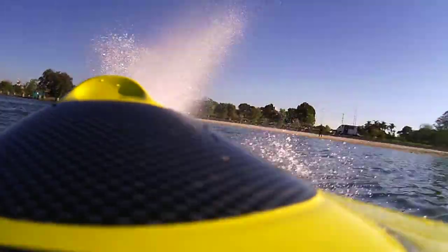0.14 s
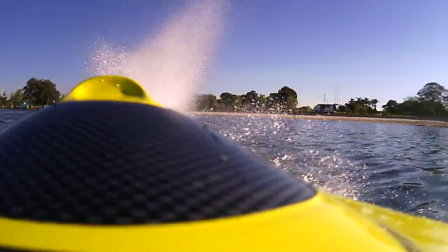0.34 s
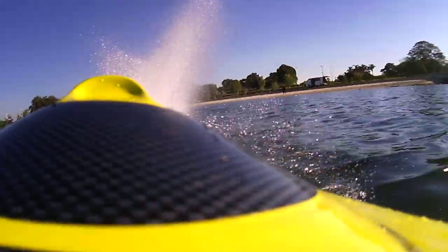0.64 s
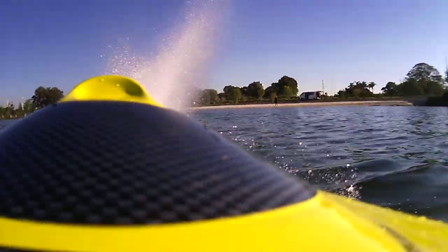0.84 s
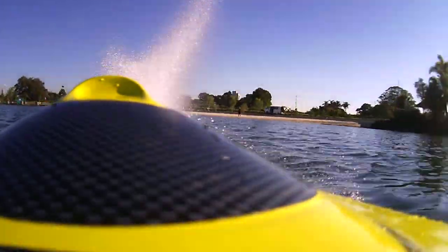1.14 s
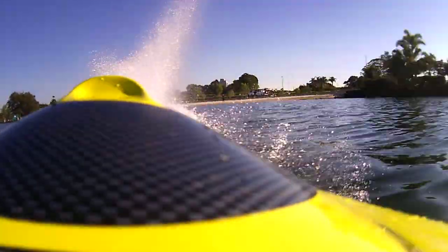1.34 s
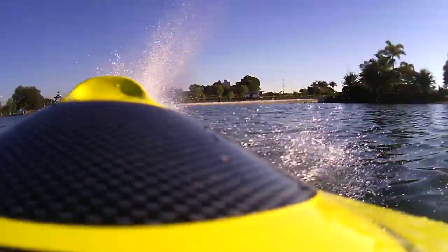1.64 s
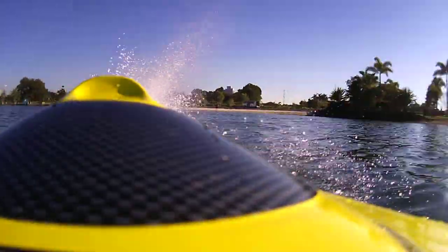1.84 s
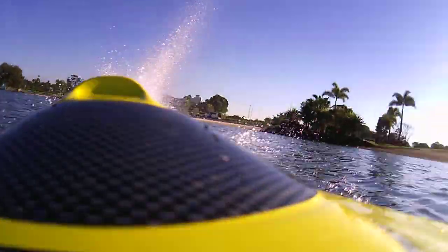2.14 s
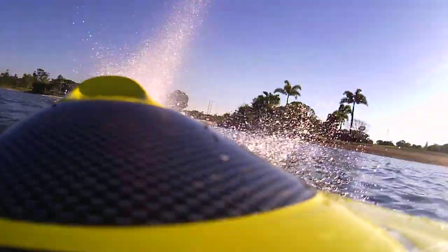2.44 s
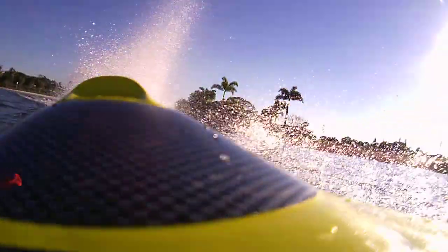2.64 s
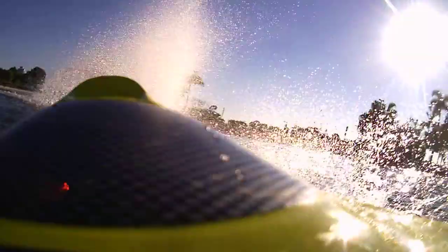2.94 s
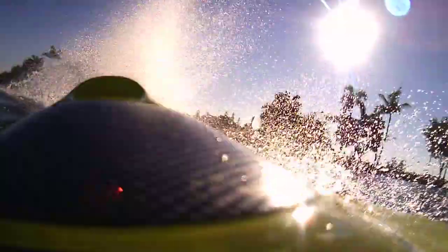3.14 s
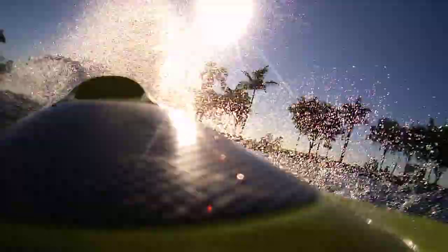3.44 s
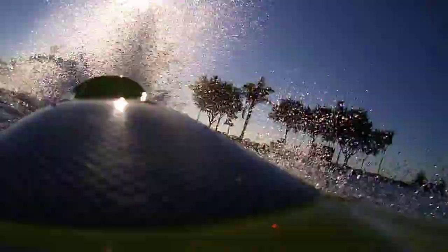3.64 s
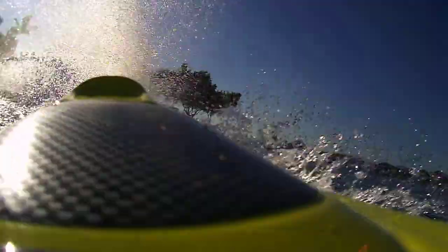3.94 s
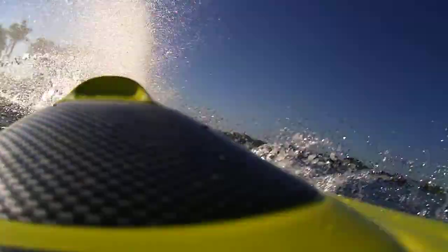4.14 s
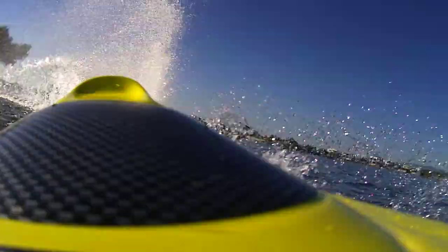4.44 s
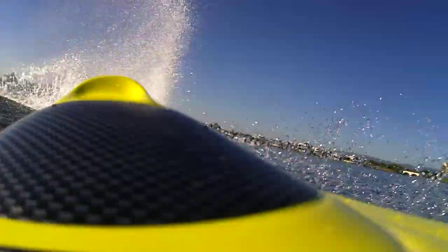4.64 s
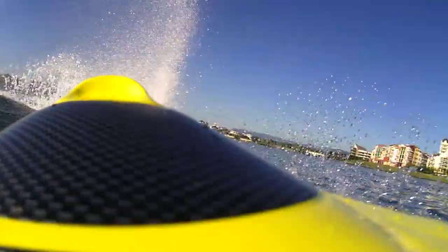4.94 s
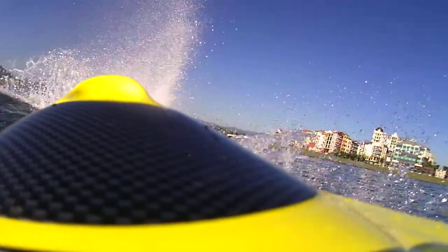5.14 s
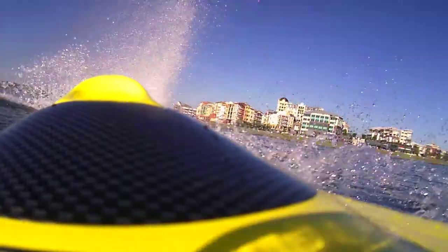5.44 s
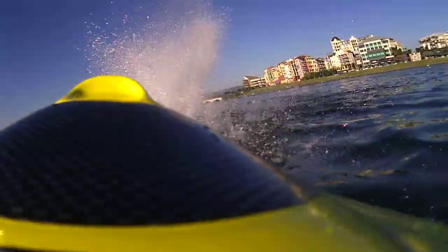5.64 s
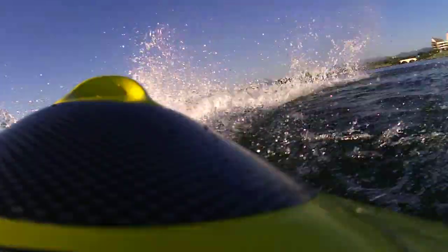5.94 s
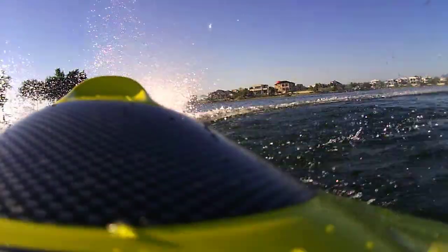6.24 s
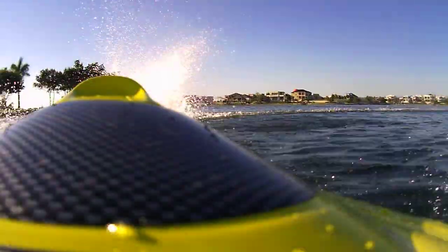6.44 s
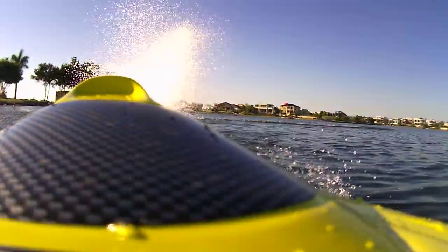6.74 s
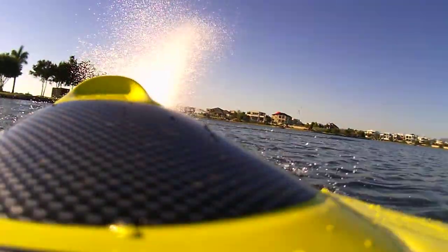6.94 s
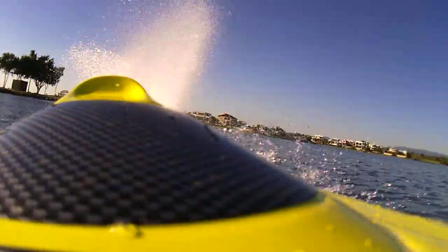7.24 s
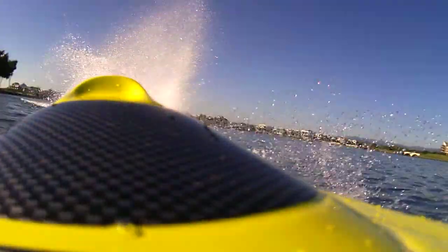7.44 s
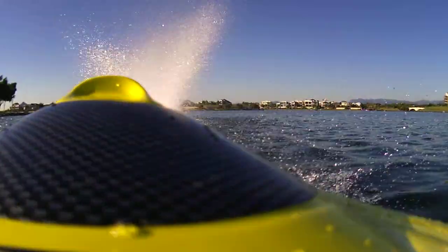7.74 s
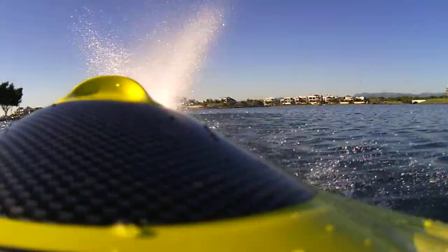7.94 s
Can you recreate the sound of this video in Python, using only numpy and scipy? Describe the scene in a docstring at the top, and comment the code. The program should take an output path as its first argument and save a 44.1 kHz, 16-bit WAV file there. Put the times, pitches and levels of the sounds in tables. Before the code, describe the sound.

A model speedboat's electric motor whines high and loud at full throttle, slightly overloading a microphone on its hull. The pitch falls and holds lower, throbbing as the boat bounces through a turn. After a quick blip it sinks almost to idle, then climbs again with a faint rough rattle. Lake water rushes underneath throughout, with a few soft slaps, while spray hisses and ticks on the deck.

```python
"""A model boat's brushless motor whines across a lake, a hand's reach from a camera's microphone on the hull.
Harmonics of the turning shaft glide through the hull's resonances as the motor runs at full throttle,
eases off, blips, almost idles and climbs again; the drive line rattles once every second turn.
Water rushes, drums and slaps under the hull, and spray hisses and ticks on the deck.
This close, the loudest stretches overload the camera."""
import sys
import numpy as np
from scipy.fft import rfft, irfft, next_fast_len
from scipy.io import wavfile
from scipy.ndimage import map_coordinates

SR = 44100
rng = np.random.default_rng(int(sys.argv[2]) if len(sys.argv) > 2 else 0)


def materialize(psi):
    """Save the field psi as 16-bit PCM at rate SR to the path in sys.argv[1].

    A 1-D psi becomes a single channel; in a 2-D psi each row is a channel.
    """
    bounded = np.clip(np.atleast_2d(psi).T, -1, 1)
    quanta = np.round(bounded * 32767).astype(np.int16)
    wavfile.write(sys.argv[1], SR, quanta)


N = 357210
TIME = np.arange(N) / SR


def amp(db):
    """Decibels to gain."""
    return 10 ** (np.asarray(db) / 20)


def unit(x):
    """Scale to rms 1."""
    return x / np.sqrt(np.mean(x ** 2) + 1e-20)


def level_at(spectrum, hz):
    """A spectrum's level in dB, read on a log frequency axis."""
    freqs, levels = np.transpose(spectrum)
    return np.interp(np.log(hz + 1), np.log(freqs + 1), levels)


def curves(rows, at=TIME):
    """One curve for each column after the first, read at the given times or speeds."""
    axis, *columns = np.transpose(rows)
    return [np.interp(at, axis, column) for column in columns]


def filtered(x, response):
    """Apply a gain that depends on frequency."""
    size = next_fast_len(N + 8192)
    return irfft(rfft(x, size) * response(np.fft.rfftfreq(size, 1 / SR)), size)[:N]


def coloured(x, spectrum):
    """Shape x by a spectrum, at rms 1."""
    return unit(filtered(x, lambda hz: amp(level_at(spectrum, hz))))


def wobble(rate):
    """A smooth random curve, rate knots a second."""
    coarse = np.arange(0, N + 32, 32)
    knots = rng.standard_normal(8192)
    return np.interp(np.arange(N), coarse, map_coordinates(knots, [coarse * rate / SR], mode="wrap"))


def add(track, start_s, sound):
    """Mix a short sound into a track."""
    part = track[round(start_s * SR):][:len(sound)]
    part += sound[:len(part)]


# Throttle moves out on the lake: t/s, new shaft speed/Hz, ramp/s
THROTTLE_MOVES = [(0.121, 418.8, 0.16), (0.728, 424.1, 0.273), (1.138, 417.8, 0.147), (1.315, 369.5, 0.101),
                  (1.409, 321.4, 0.204), (1.591, 266.0, 0.152), (1.813, 280.3, 0.178),
                  (3.176, 291.0, 0.701), (4.321, 298.8, 0.217), (4.689, 297.2, 0.155),
                  (4.907, 298.3, 0.157), (5.427, 335.1, 0.018), (5.444, 375.7, 0.068),
                  (5.519, 328.7, 0.092), (5.649, 271.8, 0.029), (5.719, 206.6, 0.028), (5.753, 184.6, 0.05),
                  (5.866, 194.1, 0.114), (6.265, 229.8, 0.08), (6.346, 322.4, 0.091), (6.756, 339.4, 0.121),
                  (7.221, 335.1, 0.195), (7.864, 363.6, 0.202)]
def shaft(start_hz, jitter, jitter_rate):
    """Shaft speed and angle: it ramps with the throttle and trembles as the propeller bites unevenly."""
    speed, last_hz = np.full(N, start_hz), start_hz
    for start, hz, ramp_s in THROTTLE_MOVES:
        speed += (hz - last_hz) * np.clip((TIME - start) / ramp_s, 0, 1)
        last_hz = hz
    trembling = speed * (1 + jitter * wobble(jitter_rate))
    return speed, 2 * np.pi * np.cumsum(trembling) / SR


def partial(angle, flutter_db, smear_rad, drift_rad=0.57):
    """One tone of rms 1 whose strength and phase flutter as the hull skips over ripples."""
    strength = amp(flutter_db * unit(wobble(24) + 1.2 * wobble(70)))
    drift = drift_rad * wobble(2)  # each tone's phase wanders slowly at random
    return unit(strength * np.sin(angle + smear_rad * wobble(55) + drift + rng.uniform(0, 2 * np.pi)))


# Single orders swelling or fading at the microphone: start/s, end/s, shaft order, lift/dB
ORDER_SWELLS = [(0, .65, 3, 3.5), (0, 1.4, 4, 2), (1.467, 1.58, 1, 5.5), (1.65, 1.686, 4, 7),
                (1.677, 2.502, 6, -17), (1.84, 1.888, 12, 15), (2.1, 2.17, 3, 8), (2.348, 2.97, 1, -4.5),
                (2.38, 3.29, 4, 1.7), (3.55, 4.0, 5, 4), (3.64, 5.15, 3, -7), (5.22, 5.37, 2, -7.5),
                (5.788, 5.87, 4, 13.5), (5.95, 6.135, 6, 9), (5.95, 6.288, 4, -5), (6.308, 6.35, 5, 11),
                (6.31, 6.36, 14, 16), (6.504, 6.68, 1, -15), (6.75, 7.249, 1, -7), (6.95, 7.8, 3, 1.7),
                (7.33, 7.747, 4, 2.5), (6.85, 8.1, 5, 3)]
def swelling(order, edge_s=0.035):
    """Passing lift or dip of one shaft order, in dB."""
    return sum(db * np.clip(np.minimum(TIME - start, end - TIME) / edge_s + 0.5, 0, 1)
               for start, end, multiple, db in ORDER_SWELLS if round(multiple) == order)


# Load on the propeller, high at full throttle and in the hard turn: t/s, load/dB
PROPELLER_LOAD = [(0, 10), (.35, 10), (1.3, 6.5), (1.8, -8.5), (1.92, -2.5), (2.35, -3.5), (2.4, -0.5),
                  (3.27, 1), (3.31, -6.5), (3.9, -1.5), (4.7, -8), (5.4, -6.5), (5.52, 4.5), (5.7, -6),
                  (5.9, -7.5), (6, 3), (6.25, 2), (6.42, -11.5), (6.75, 0), (6.9, -0.5), (7.45, 2.5),
                  (7.95, 2.5), (8.05, 9.5)]
# The motor's whistle at full throttle: t/s, level/dB
WHISTLE_LEVEL = [(0, -32.5), (.3, -27.5), (1.33, -21), (1.45, -41), (1.6, -83.5)]
# Hull and camera housing, between motor and microphone: f/Hz, gain/dB
HULL_RESPONSE = [(190, -23.5), (275, -28.5), (295, -26), (350, -14), (420, -8.5), (560, -6), (700, -15.5),
                 (840, -4.5), (900, -8.5), (1000, 2), (1160, 4), (1300, -5.5), (1440, 1.5), (1550, -4),
                 (1700, -4), (2100, -11.5), (2400, -5), (3100, -19), (3370, -7), (3550, -15.5),
                 (4200, -17.5)]
# Body of the whine: shaft order, level before the hull/dB, dB per dB of load, share of the throb,
# flutter/dB, phase smear/rad
LOW_ORDERS = [(1, -3.5, -0.21, 0, 1.5, .05), (2, -13, 0.6, 0.12, 2.03, 0.063), (3, -22, 1, 0, 2.12, .05),
              (4, -21.5, 0.944, 0.87, 1.4, 0.06)]
# Top of the whine: shaft order, level before the hull/dB, dB per dB of load, level on the whistle/dB
UPPER_ORDERS = [(5, -24, 0.54, -17.5), (6, -25.5, 0.8, -7.5), (7, -26, 0.74, -15), (8, -26.5, 0.6, 2),
                (9, -34, 1.2, -3.5), (10, -29.5, 0.65, -11.5), (11, -27.5, 1.2, -27), (12, -30, 0.5, -30),
                (13, -31, -0.2, -23), (14, -36, -0.2, -25.5), (17, -41, -0.5, -29), (18, -36.5, 2, -29)]
def motor(speed, angle, spurt_db=2, spurt_rate=11):
    """Shaft orders follow the load and flare as they glide through the hull's resonances."""
    load_db, = curves(PROPELLER_LOAD)
    whistle_db, = curves(WHISTLE_LEVEL)
    throb_db = throbbing(width_s=0.017)

    def through_hull(order, db, per_load, throb_share):
        source_db = db + per_load * load_db + throb_share * throb_db + swelling(order)
        return amp(source_db + level_at(HULL_RESPONSE, order * speed))

    whine = np.zeros(N)
    for order, db, per_load, throb_share, flutter_db, smear_rad in LOW_ORDERS:
        order = round(order)
        strength = through_hull(order, db, per_load, throb_share)
        whine += strength * partial(order * angle, flutter_db, smear_rad)
    for order, db, per_load, whistle_share_db in UPPER_ORDERS:
        order = round(order)
        spurts = unit(amp(spurt_db * wobble(spurt_rate)))
        spurting = spurts * through_hull(order, db, per_load, throb_share=0.15)
        strength = np.hypot(spurting, amp(whistle_db + whistle_share_db))  # the two add in power
        whine += strength * partial(order * angle, flutter_db=2.5, smear_rad=0.1)
    return whine


# The drive line, close to the microphone: t/s, level/dB
RATTLE_LEVEL = [(0, -43.5), (2, -51.5), (3.2, -51.5), (3.9, -44.5), (5.3, -36), (6.1, -63.5), (6.6, -34.5),
                (7.2, -35.5), (8.1, -37.5)]
# Its tones: shaft order, relative level/dB
HALF_ORDERS = [(.5, -17), (1.5, 0.5), (2.5, -10.5), (3.5, 7.5), (4.5, -3.5)]
def rattle(angle):
    """The drive line rattles every second turn, making rough tones halfway between the shaft orders."""
    level_db, = curves(RATTLE_LEVEL)
    tones = sum(amp(db) * partial(round(2 * order) / 2 * angle, flutter_db=4, smear_rad=0.54)
                for order, db in HALF_ORDERS)
    return amp(level_db) * tones


# Water around the boat, louder at speed: shaft speed/Hz, rush/dB, spray/dB, drumming/dB
WATER_LEVELS = [(191, -23.5, -26.5, -49.5), (287.5, -22.5, -25, -42), (341.2, -17.5, -22, -42),
                (421.5, -12.5, -14, -45)]
# Rougher patches of the lake throw more spray: t/s, lift/dB
ROUGH_PATCHES = [(0, 0), (1.8, 1), (2.4, 0.4), (3.3, 0.4), (3.8, 2.3), (4.2, 3), (4.7, 2.8), (5.1, 2.5),
                 (5.5, 2), (5.9, 2), (6.2, 1), (6.38, 1.5), (6.7, -4), (7.05, 2), (7.5, 1.4), (7.9, -0.5)]
# The rush under the hull, just below the microphone: f/Hz, relative level/dB
RUSH_SPECTRUM = [(60, -37), (150, -27.5), (230, -17.5), (310, -11), (395, -11), (520, -13), (720, -12.5),
                 (900, -7.5), (1050, -2.5), (1170, 2.5), (1300, -2), (1470, -2.5), (1700, -10.5),
                 (4000, -41.5)]
# Spray on the deck beside the microphone: f/Hz, relative level/dB
SPRAY_SPECTRUM = [(800, -20.5), (1500, -21), (1850, 3), (2100, -3), (2400, -1), (2750, -3.5), (3000, -7),
                  (3350, -3.5), (3750, -7.5), (4100, -13), (4500, -10.5)]
def water(speed, angle, churn, rush_lumps_db, spray_lumps_db, impacts_per_s, impacts_db):
    """Water rushes under the hull, chopped by the propeller; spray is a hiss full of tiny impacts."""
    rush_db, spray_db, _ = curves(WATER_LEVELS, at=speed)
    rough_db, = curves(ROUGH_PATCHES)
    chop = 1 + churn * np.cos(angle)
    bumps = wobble(45)  # the larger bumps reach both rush and spray
    flow = rng.standard_normal(N) * chop
    rush_lumps = amp(rush_lumps_db * unit(bumps + wobble(130)))
    rush = coloured(flow * rush_lumps, RUSH_SPECTRUM)
    impacts = (rng.random(N) < impacts_per_s / SR) * rng.standard_normal(N)
    mist = rng.standard_normal(N) + amp(impacts_db) * unit(impacts)
    spray_lumps = amp(spray_lumps_db * unit(bumps / 2 + wobble(110)))
    spray = coloured(mist * chop * spray_lumps, SPRAY_SPECTRUM)
    return amp(rush_db + 0.45 * rough_db) * rush + amp(spray_db + rough_db) * spray


# The hull's rumble under the camera: f/Hz, relative level/dB
DRUM_SPECTRUM = [(12, -4.5), (28, 3), (55, -3.5), (102, 1.5), (145, -16.5), (250, -26)]
def drumming(speed):
    """The hull rumbles faintly on the ripples."""
    _, _, level_db = curves(WATER_LEVELS, at=speed)
    return amp(level_db) * coloured(rng.standard_normal(N), DRUM_SPECTRUM)


# Wavelets against the hull, at close range: t/s, peak level/dB
WAVELETS = [(1.803, -16), (2.24, -12), (2.344, -6), (4.027, -14), (4.101, -13)]
def slaps(ring_hz, t60, rise_s):
    """A wavelet pushes softly on the hull, which rings briefly at its main resonance."""
    track, t = np.zeros(N), np.arange(SR // 10) / SR
    envelope = (1 - np.exp(-t / rise_s)) * amp(-60 * t / t60)
    ring = envelope / envelope.max() * np.sin(2 * np.pi * ring_hz * t)
    for start, db in WAVELETS:
        add(track, start, amp(db) * ring)
    return track


# Bounces of the hull in the hard turn: t/s, lift/dB
BOUNCES = [(2.401, 6), (2.446, 4.5), (2.513, 3.5), (2.576, 8), (2.725, 8), (2.796, 5.5), (2.881, 6.5),
           (3.06, 7), (3.152, 4), (3.2, 5)]
def throbbing(width_s):
    """The whine swells at each bounce: a lift in dB, of which each order takes its share."""
    return sum(db * np.exp(-((TIME - centre) / width_s) ** 2) for centre, db in BOUNCES)


# Large drops landing near the microphone: t/s, level before colouring/dB
DECK_DROPS = [(2.632, -6), (3.841, -10), (3.982, -4), (4.029, -9), (4.103, -5), (4.456, -13.5),
              (4.676, -6.5), (5.338, -7.5), (7.103, -18.5), (7.729, -11)]
def drops(t60):
    """Each drop strikes the deck with a very short tick, coloured like the spray."""
    track, t = np.zeros(N), np.arange(SR // 20) / SR
    for start, db in DECK_DROPS:
        add(track, start, amp(db - 60 * t / t60) * rng.standard_normal(len(t)))
    return filtered(track, lambda hz: amp(level_at(SPRAY_SPECTRUM, hz) + 6.5))


def scene():
    """Motor and water on the lake, all within a hand's reach of the microphone."""
    speed, angle = shaft(start_hz=417.1, jitter=0.0014, jitter_rate=65)
    wash = water(speed, angle, churn=0.15, rush_lumps_db=1.5, spray_lumps_db=1.27,
                 impacts_per_s=2000, impacts_db=-5.5)
    hits = slaps(ring_hz=1111, t60=0.045, rise_s=0.007) + drops(t60=0.018)
    return (motor(speed, angle) + rattle(angle) + wash + drumming(speed) + hits)[None]


# Treble of the camera on the hull: f/Hz, gain/dB
CAMERA_TREBLE = [(4100, 0), (4550, -6), (5500, -7.5), (6700, -2.5), (9500, -3), (11500, -4.5), (15000, -2)]
def record(dry, band_hz=4050, clip_level=0.71, top_hz=15800):
    """The camera hears a narrow band and clips hard, so only the overload crackles in the treble."""
    narrow = filtered(dry[0], lambda hz: 1 / np.sqrt(1 + (hz / band_hz) ** 52))  # steep low-pass
    clipped = np.clip(narrow, -clip_level, clip_level)
    return filtered(clipped, lambda hz: amp(level_at(CAMERA_TREBLE, hz)) * (hz < top_hz))[None]


dry = scene()
out = record(dry)
materialize(out)
```